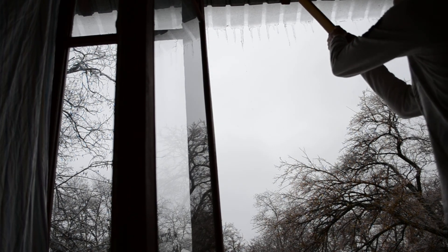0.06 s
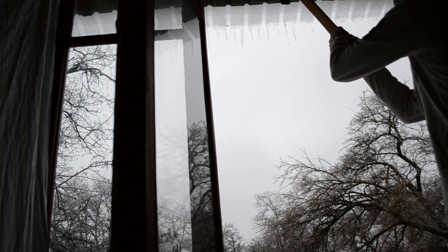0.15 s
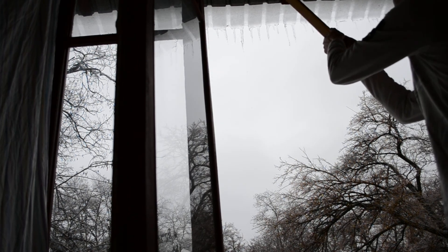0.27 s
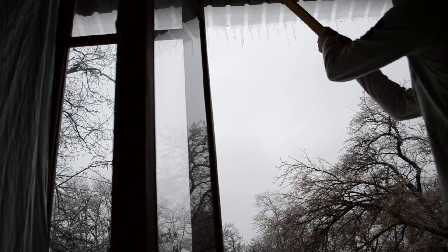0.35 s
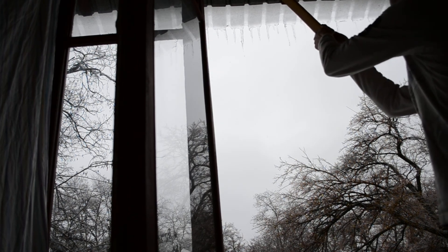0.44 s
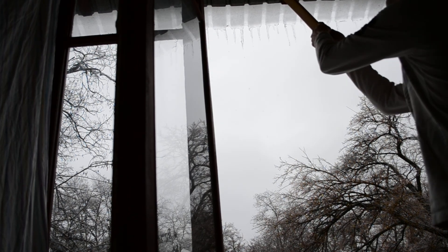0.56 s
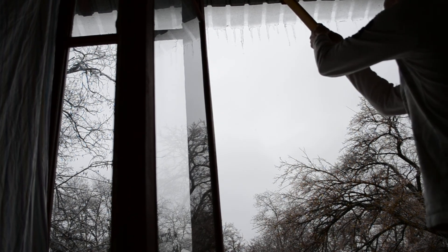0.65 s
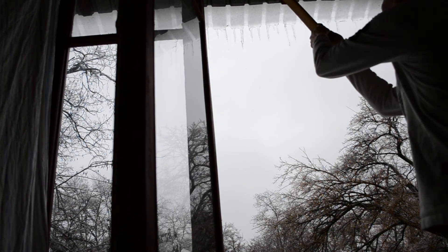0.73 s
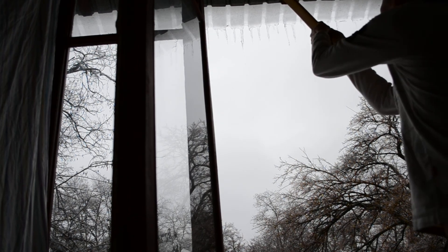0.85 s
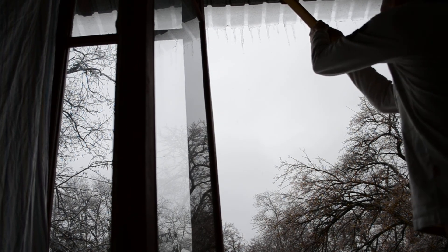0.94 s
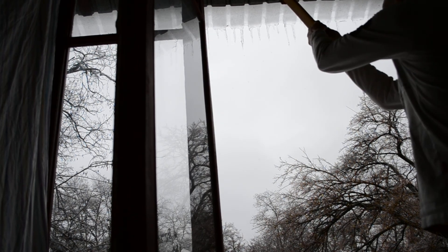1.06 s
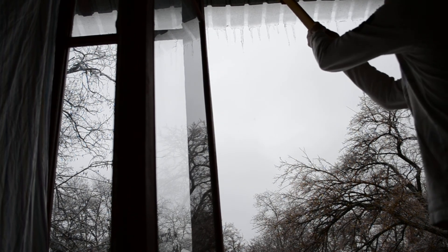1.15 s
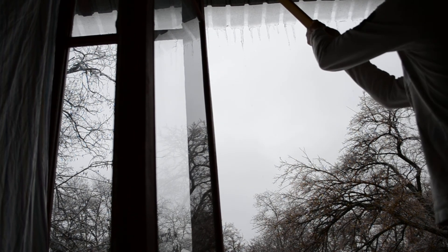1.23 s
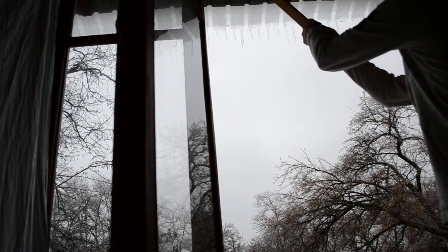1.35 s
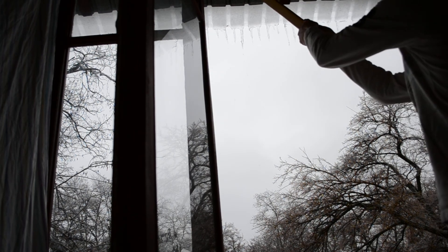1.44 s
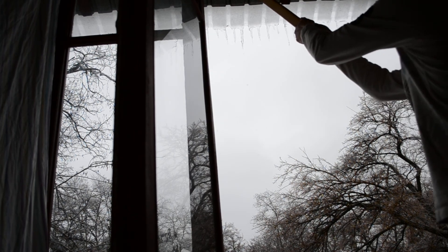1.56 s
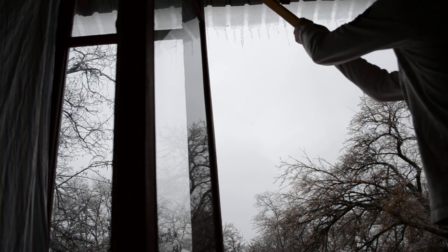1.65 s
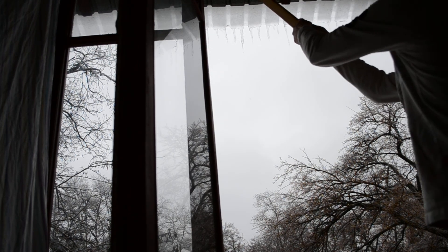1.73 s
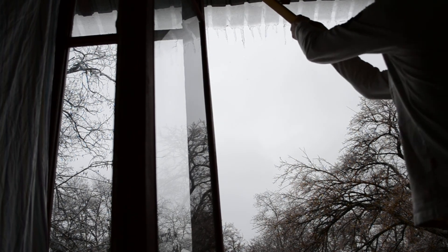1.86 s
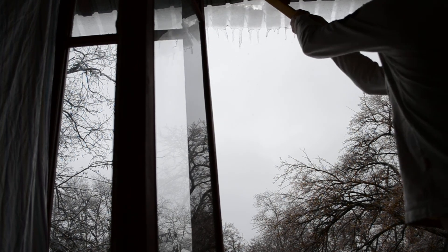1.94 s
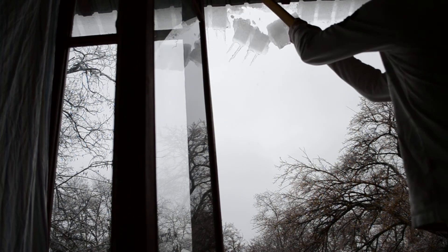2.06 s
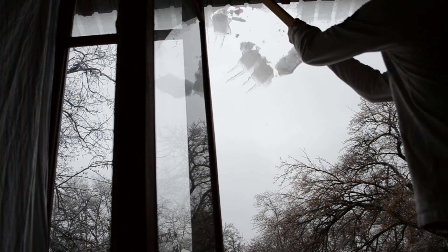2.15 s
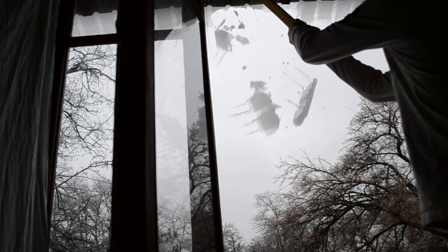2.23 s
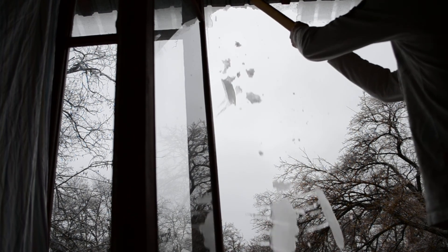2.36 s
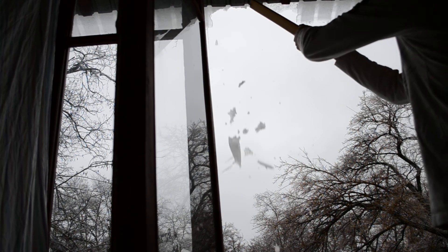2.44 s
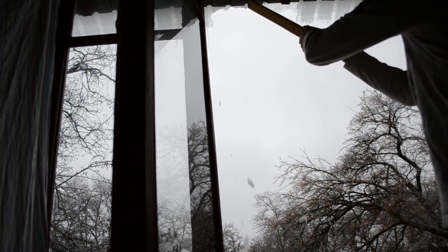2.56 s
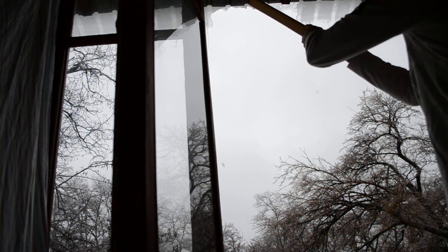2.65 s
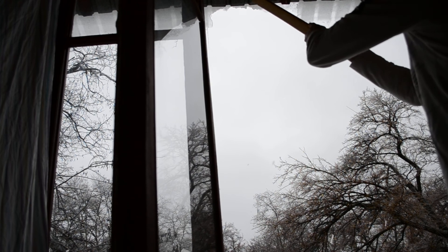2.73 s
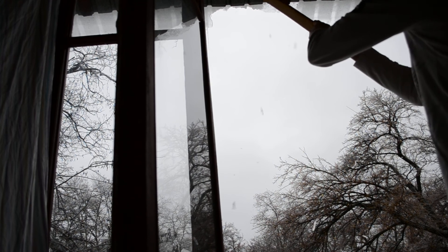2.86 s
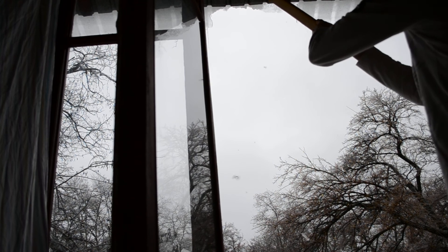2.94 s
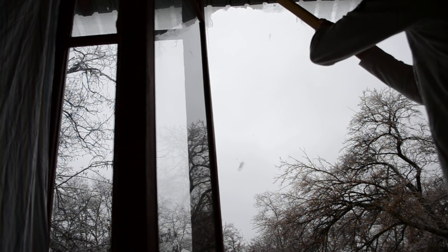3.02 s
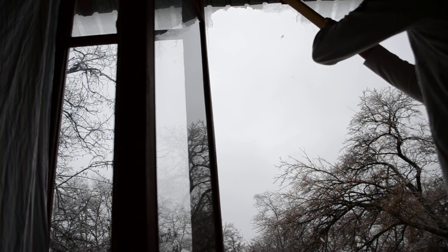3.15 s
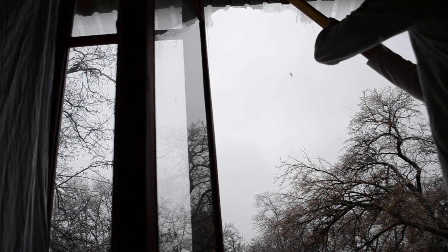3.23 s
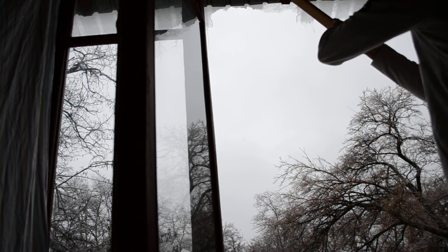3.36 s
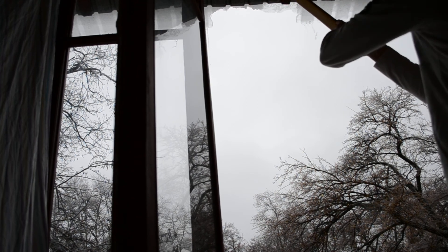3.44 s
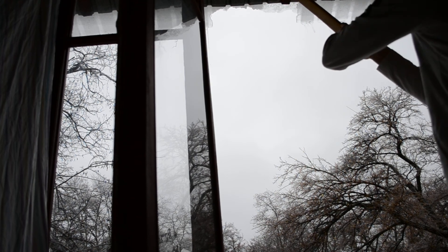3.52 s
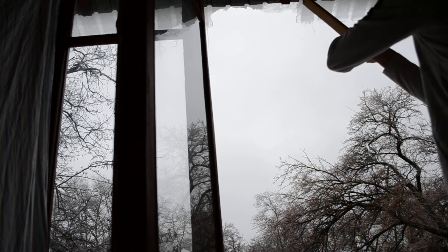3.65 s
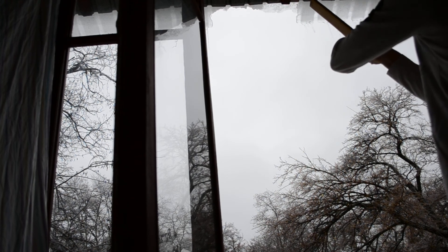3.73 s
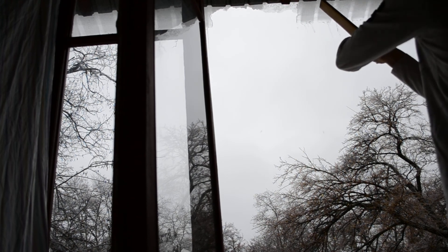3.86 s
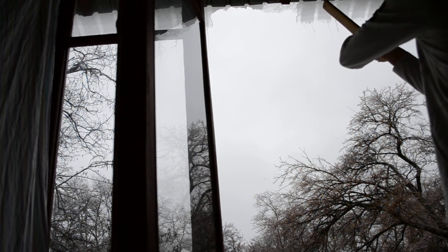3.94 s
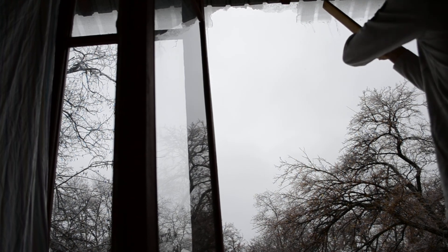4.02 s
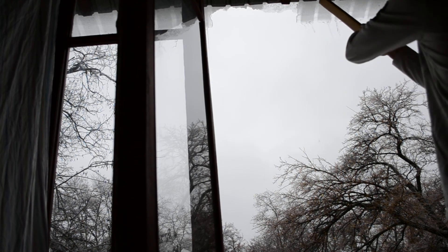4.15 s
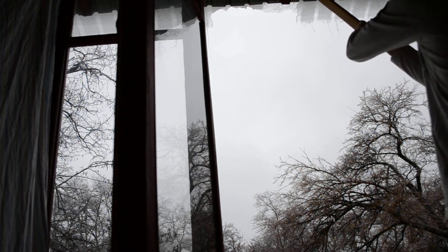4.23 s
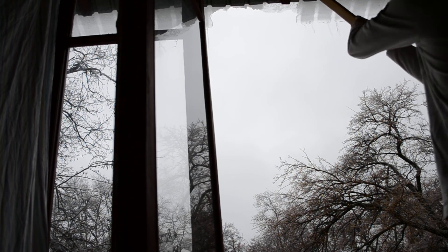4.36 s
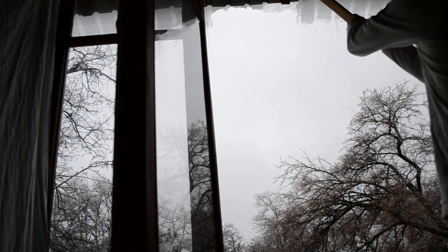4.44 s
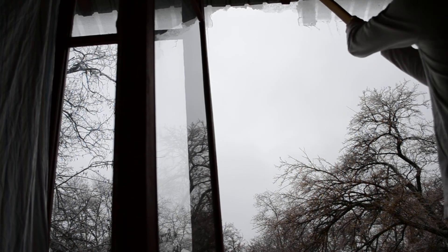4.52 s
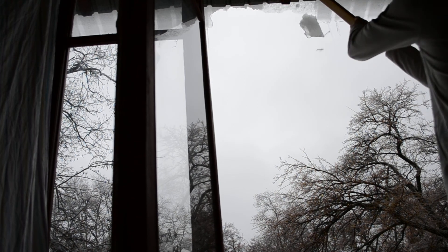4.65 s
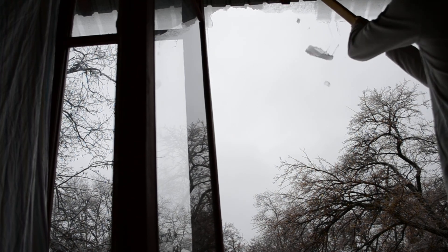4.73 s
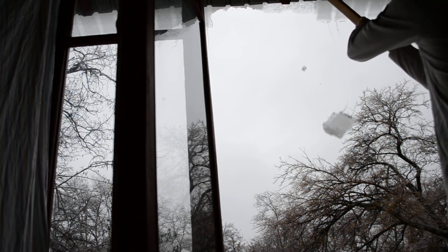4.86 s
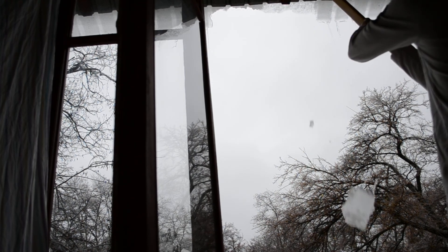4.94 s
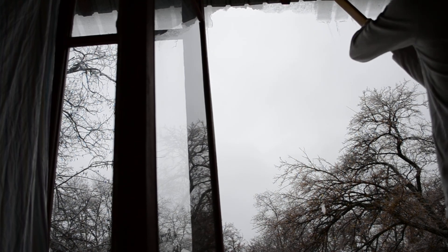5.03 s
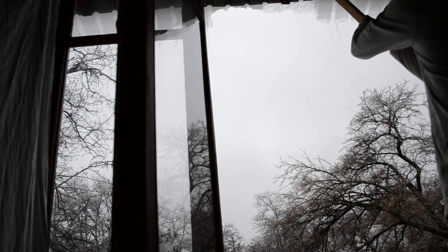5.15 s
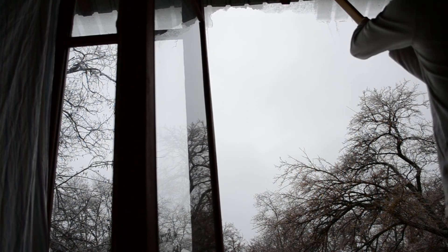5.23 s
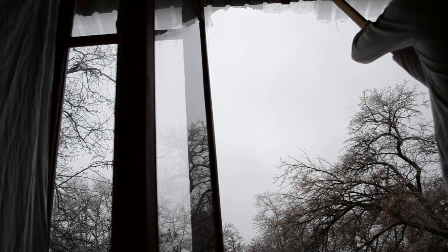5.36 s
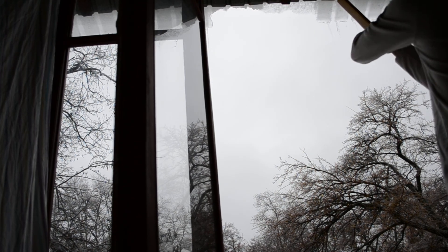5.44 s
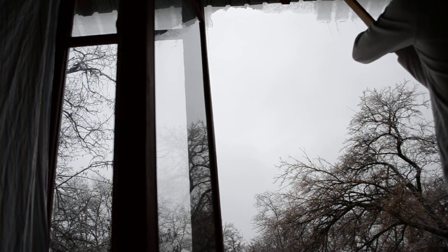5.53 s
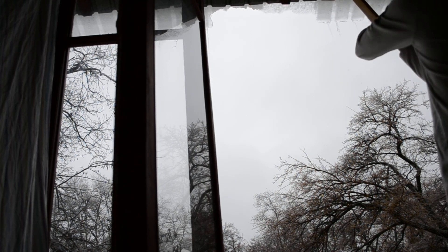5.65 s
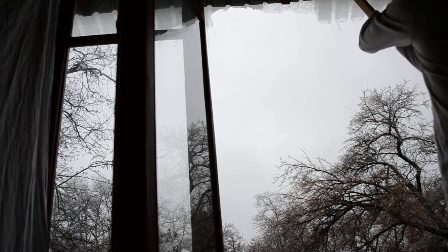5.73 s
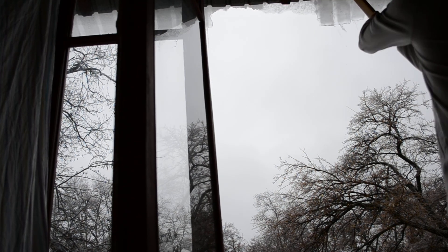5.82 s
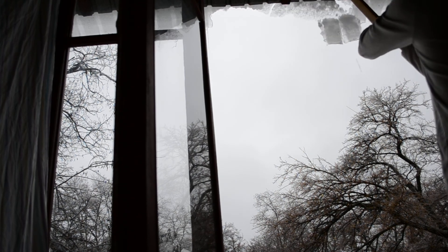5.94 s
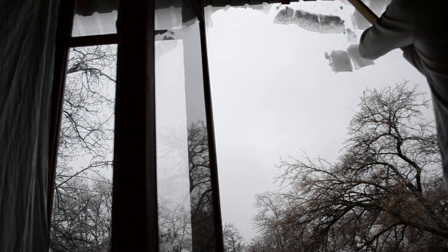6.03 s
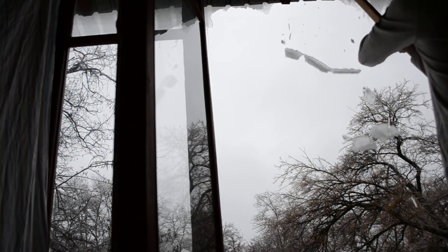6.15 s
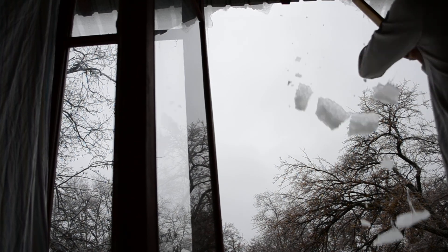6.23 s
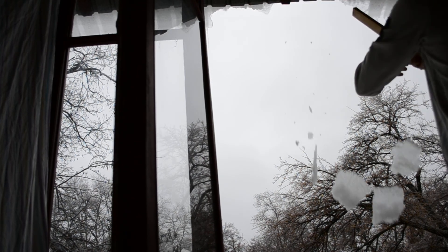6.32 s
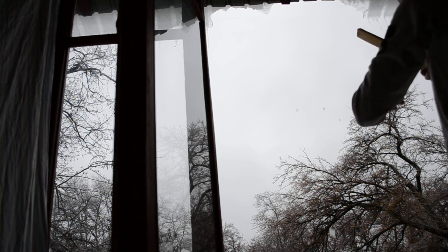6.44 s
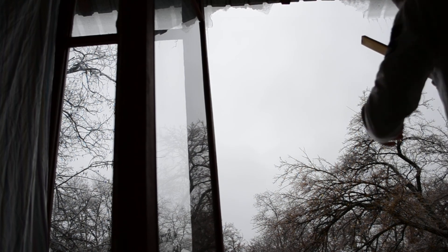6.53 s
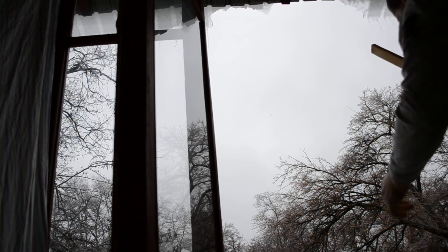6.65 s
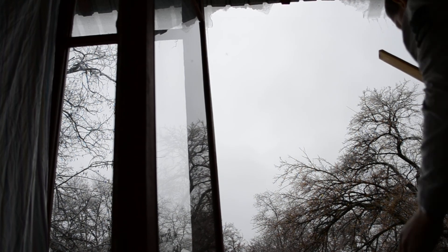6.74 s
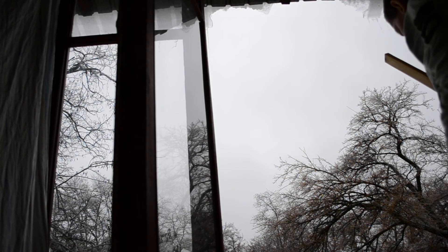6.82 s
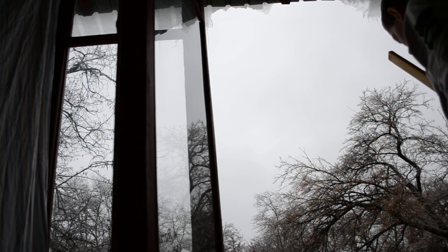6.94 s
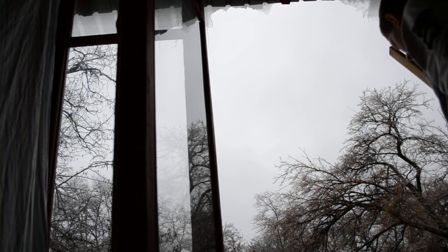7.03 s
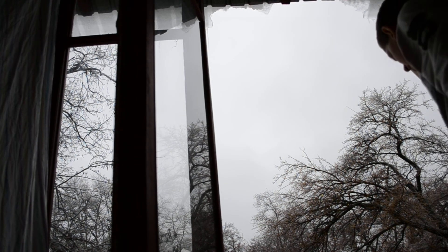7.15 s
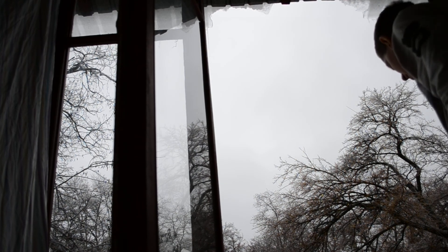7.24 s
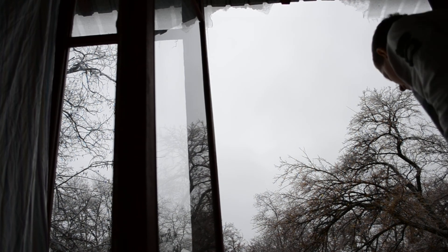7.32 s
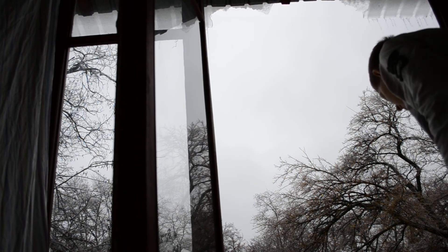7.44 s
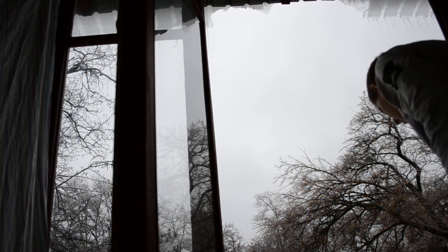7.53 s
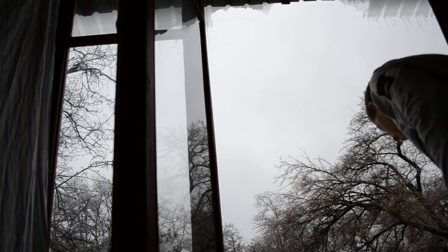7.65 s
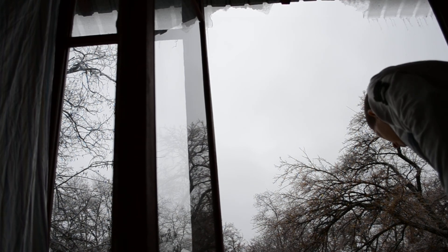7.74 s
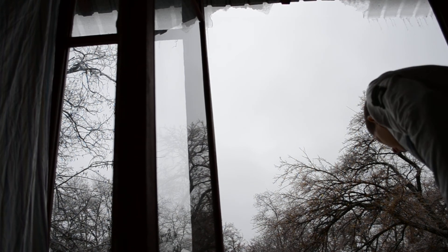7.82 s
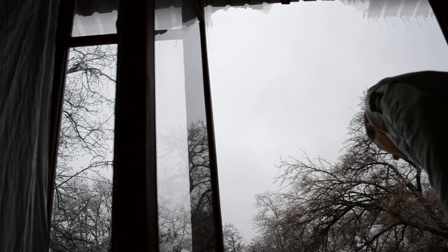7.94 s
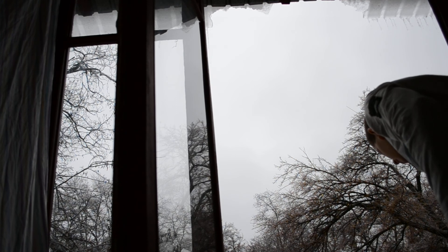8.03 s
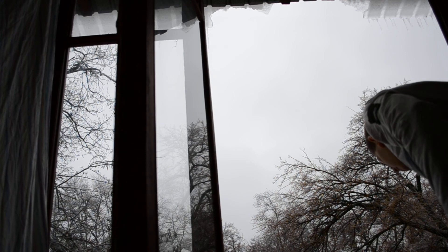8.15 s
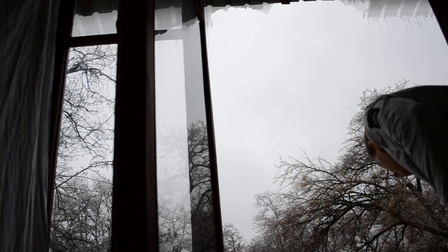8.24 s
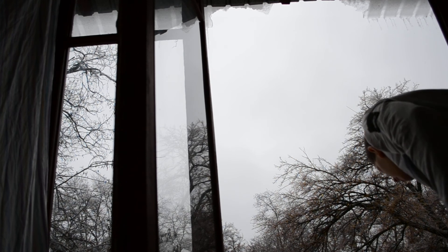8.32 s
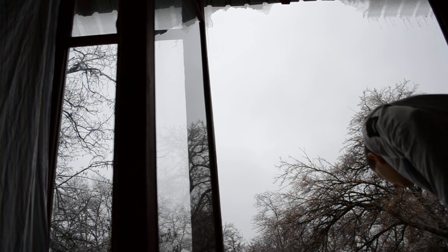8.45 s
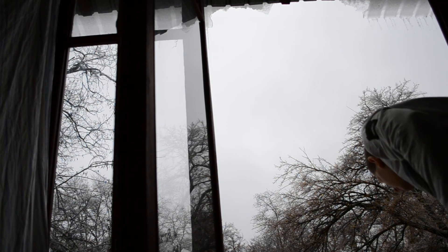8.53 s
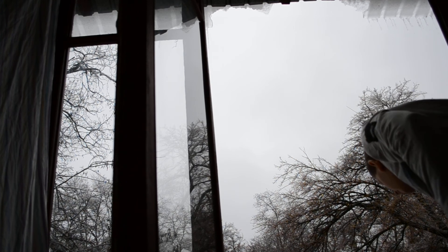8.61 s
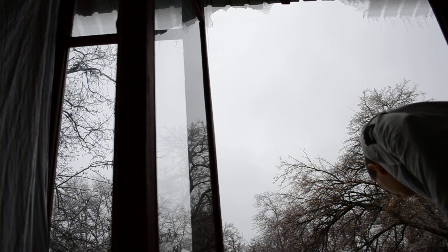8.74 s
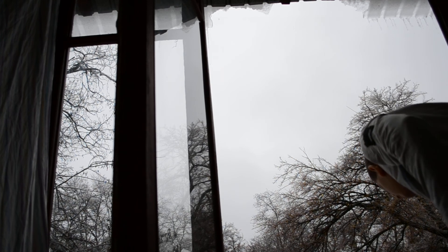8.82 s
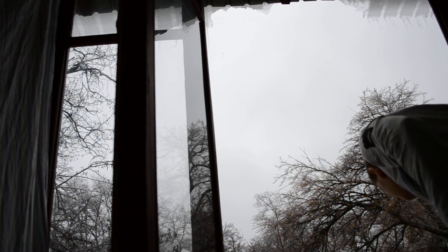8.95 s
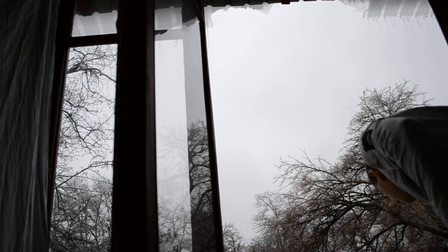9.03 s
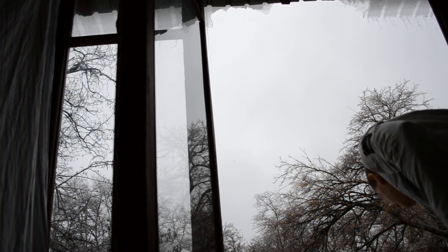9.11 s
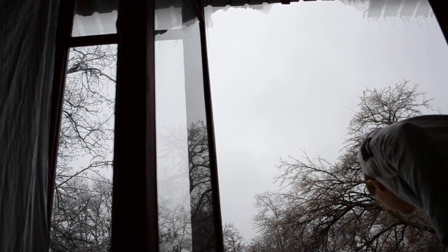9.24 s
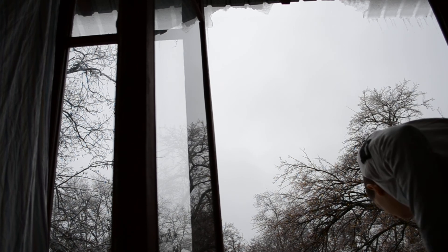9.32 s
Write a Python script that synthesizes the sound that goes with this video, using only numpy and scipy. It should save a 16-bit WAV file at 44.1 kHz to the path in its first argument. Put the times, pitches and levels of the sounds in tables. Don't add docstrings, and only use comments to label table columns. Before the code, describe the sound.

A stick pokes ice from a sheet-metal roof edge. Light knocks and brief thin squeaks lead to slabs giving way in crunchy bursts with low thuds and bright crackle. A hard, explosive smash follows, then spaced pokes and another big crack. Fine crumbs and glassy chips tick down irregularly, with faint low rumble, fading into quiet outdoor air. Captured by a small microphone just indoors, slightly overloaded at the loudest hit.

```python
import sys
import numpy as np
from scipy import signal
from scipy.fft import rfft, irfft, next_fast_len
from scipy.io import wavfile
from scipy.ndimage import uniform_filter1d

SR = 44100
rng = np.random.default_rng(int(sys.argv[2]) if len(sys.argv) > 2 else 0)


def convert_level_to_amplitude(level_db):
    exponent = np.asarray(level_db, float) / 20
    return 10 ** exponent


def waveform_to_disk(signal):
    frames = np.transpose(np.atleast_2d(signal))
    scaled = np.clip(frames, -1, 1) * 32767
    samples = np.round(scaled).astype(np.int16)
    wavfile.write(sys.argv[1], SR, samples)


N = 413658


def rms_one(x):
    return x / np.sqrt(np.mean(x ** 2) + 1e-20)


def coloured(spectrum):
    hz = np.maximum(np.fft.rfftfreq(N, 1 / SR), 1)
    points = np.array(spectrum)
    gain = convert_level_to_amplitude(np.interp(np.log(hz), np.log(points[:, 0]), points[:, 1]))
    return rms_one(irfft(rfft(rng.standard_normal(N)) * gain, N))


def flicker(rate_hz):
    slow = signal.butter(2, rate_hz, fs=SR, output="sos")
    return rms_one(signal.sosfilt(slow, rng.standard_normal(N)))


def swells(start, lasting, db, rise_db_per_s, fade_db_per_s):
    t = np.arange(0, N + 64, 64)[:, None] / SR
    before = np.maximum(start - t, 0)
    after = np.maximum(t - start - np.abs(lasting), 0)
    each = db - rise_db_per_s * before - fade_db_per_s * after
    total = 10 * np.log10(np.sum(convert_level_to_amplitude(2 * each), axis=1) + 1e-12)
    return np.interp(np.arange(N) / SR, t[:, 0], total)


def ring(clicks, hz, t60):
    r, w = convert_level_to_amplitude(-60 / (t60 * SR)), 2 * np.pi * hz / SR
    return signal.lfilter([.5, 0, -.5], [1, -2 * r * np.cos(w), r * r], clicks + 1e-18)


def grains(per_s, spread_db):
    sizes = convert_level_to_amplitude(spread_db * np.minimum(rng.exponential(1, N), 5)) * rng.choice([-1, 1], N)
    return rms_one(sizes * (rng.random(N) < per_s / SR))


# (f/Hz, level/dB per Hz)
HUSH_COLOUR = [(35, -30), (60, -17), (100, -15.5), (410, -5.5), (1280, -8.5), (6290, -21), (9310, -26),
               (11100, -22)]


def outdoor_hush():
    return convert_level_to_amplitude(-56 + .6 * flicker(3)) * coloured(HUSH_COLOUR)


# (t/s, lasting/s, level/dB)
SHAKES = [
    (2.04, .05, -63),
    (2.56, .02, -44.5),
    (5.75, 0.19, -62),
    (6.55, .02, -52),
]


def shudder():
    level_db = swells(*np.transpose(SHAKES), rise_db_per_s=125, fade_db_per_s=30)
    deep = coloured([(18, -21), (28, -1), (50, 3), (75, -12.0), (150, -68)])
    return convert_level_to_amplitude(np.maximum(-73, level_db)) * deep


def ground_rumble(slab_db):
    return convert_level_to_amplitude(slab_db - 19) * coloured([(50, -35), (90, -8), (140, 6.0), (220, -14.5), (400, -68)])


# (t/s, lasting/s, level/dB, heaviness/dB)
STREAMS = [(.77, 0.011, -44.5, 2), (.92, 0.21, -55.5, 3), (1.94, 0.085, -42.5, -1.5),
           (2.64, 0.096, -30.5, 5.5), (2.88, .02, -32, 0), (3.1, 0.41, -40, 0.5), (3.53, 0.41, -38.5, -4.5),
           (4.08, 0.23, -50.5, -5), (4.57, .15, -50, 4.5), (5.29, 0.02, -46, 5.5), (5.42, 0.12, -54.5, -24),
           (5.858, 0.0035, -37.5, 2), (6.2, 0.18, -47, -19), (6.4, 0.17, -46.5, 7.5),
           (6.6, .05, -44.5, 8.5), (6.83, 0.36, -43.5, -6), (7.2, 0.38, -41, -10), (7.8, 0.24, -48, -8)]


def debris():
    start, lasting, db, heavy = np.transpose(STREAMS)
    return [swells(start, lasting, level, rise_db_per_s=169.5, fade_db_per_s=56)
            for level in (db + heavy, db, db - 7 - 0.17 * heavy)]


def crumble(body, level_db, clump_db, count=10):
    low_hz, high_hz, cycles, per_s, spread_db, tilt_db = body
    stream, dealt = grains(per_s, spread_db), rng.integers(0, count, N)
    rings = np.zeros(N)
    for k, hz in enumerate(np.geomspace(low_hz, high_hz, count)):
        brightness = convert_level_to_amplitude(tilt_db * np.log2(hz / low_hz))
        rings += brightness * ring(stream * (dealt == k), hz, cycles / hz)
    return convert_level_to_amplitude(level_db + clump_db * flicker(19.8)) * rms_one(rings)


# (lowest f/Hz, highest f/Hz, cycles of ringing, cracks per s, size spread/dB, tilt/dB per octave)
TICK = (2000, 10000, 6.0, 70, 3.0, 2.0)


def ticks(crumb_db):
    return crumble(TICK, crumb_db - 15.0, clump_db=0.5, count=5)


# (t/s, lasting/s, from f/Hz, to f/Hz, level/dB)
SQUEAKS = [
    (1.675, .075, 3950, 3780, -52),
    (1.71, .095, 3650, 3250, -53),
    (1.68, .07, 5400, 4700, -67),
    (1.28, .25, 3200, 3100, -64),
    (.665, .05, 3900, 3950, -60),
    (5.37, .025, 3900, 3900, -50),
]


def squeaks():
    out, slip = np.zeros(N), .8 + .7 * flicker(200)
    for s, lasting, from_hz, to_hz, db in SQUEAKS:
        start, size = round(s * SR), int(lasting * SR)
        phase = 2 * np.pi * np.cumsum(np.geomspace(from_hz, to_hz, size)) / SR
        out[start:start + size] += convert_level_to_amplitude(db) * np.hanning(size) ** .5 * np.sin(phase)
    return out * slip


# (t/s, peak level/dB, f/Hz)
CHIPS = [(1.2855, -46, 3120), (1.3558, -45, 3110), (1.7255, -37, 3710), (1.7544, -31, 3360),
         (1.7904, -23, 3320), (1.8008, -19, 2720), (1.8956, -11, 2880), (2.0467, -10, 2240),
         (2.4703, -29, 3280), (2.5177, -11, 3150), (2.5374, -15, 3510), (2.5504, -17, 3540),
         (2.61, -9, 2340), (2.6444, -17, 5110), (2.6644, -19, 9130), (2.7122, -15, 5110),
         (2.9487, -21, 3240), (2.9911, -15, 2420), (3.1014, -26, 3850), (3.2101, -28, 3310),
         (3.2264, -29, 2760), (3.2685, -31, 4860), (3.2869, -23, 8310), (3.3014, -28, 3770),
         (3.5778, -23, 3380), (3.6511, -29, 2200), (3.7114, -19, 2290), (3.7479, -19, 3090),
         (3.7973, -26, 2900), (3.8094, -28, 2550), (3.8227, -30, 4180), (3.9838, -30, 2970),
         (4.0292, -27, 4050), (4.3096, -36, 3220), (4.3444, -39, 8200), (4.3755, -13, 3820),
         (4.3844, -19, 2640), (4.4894, -38, 2860), (4.5344, -21, 2540), (4.5444, -22, 2560),
         (4.8204, -37, 2680), (4.8763, -44, 2990), (5.1264, -21, 2670), (5.1562, -17, 2570),
         (5.6905, -8, 2920), (5.6954, -8, 2210), (5.7014, -8, 2280), (5.8002, -26, 2390),
         (5.8187, -26, 2530), (5.8554, -23, 2560), (5.9494, -25, 2860), (8.6023, -47, 2380),
         (9.3162, -43, 2790)]
# (t/s, peak level/dB, f/Hz)
LATE_CHIPS = [(5.9288, -25, 2770), (6.0425, -36, 3880), (6.0804, -39, 9480), (6.1622, -38, 8970),
              (6.2026, -37, 9060), (6.2151, -35, 8790), (6.253, -36, 6690), (6.2725, -35, 8880),
              (6.3418, -29, 2380), (6.4052, -31, 4440), (6.466, -27, 4240), (6.491, -20, 4100),
              (6.5843, -35, 3650), (6.6471, -26, 2840), (6.7763, -22, 5820), (6.7898, -13, 4330),
              (6.8512, -24, 9390), (6.923, -20, 3200), (6.9824, -27, 3120), (7.0253, -30, 3320),
              (7.0637, -32, 5250), (7.0801, -28, 2860), (7.1679, -31, 2350), (7.2004, -22, 5980),
              (7.2383, -21, 3310), (7.2827, -27, 3950), (7.3615, -22, 3330), (7.4558, -34, 8890),
              (7.4972, -27, 3820), (7.5102, -26, 2340), (7.6354, -28, 8330), (7.6623, -27, 3050),
              (7.7796, -33, 3370), (7.8055, -33, 8960), (7.8454, -36, 6130), (7.8664, -36, 6510),
              (7.9497, -29, 2830), (8.0125, -36, 2560), (8.0614, -40, 9150), (8.1048, -39, 8660),
              (8.1348, -41, 8790), (8.1916, -35, 2750), (8.445, -39, 8590), (8.7898, -43, 8840),
              (8.9494, -42, 8530)]
# (share of its pitch, level/dB)
CHIP_MODES = [(.6, -8.0), (1.0, -4.0), (1.7, -8.0)]


def chips():
    landings = CHIPS + [(s, db - 4.0, hz) for s, db, hz in LATE_CHIPS]
    return [(s, min(share * hz, 11000), db + mode_db, 40.0 / hz)
            for s, db, hz in landings for share, mode_db in CHIP_MODES]


# (t/s, f/Hz, peak level/dB, t60/s, the
# time to fade by 60 dB)
RINGS = [(.539, 454, -29, 0.084), (.54, 642, -17.5, 0.034), (.54, 2720, -38, 0.047),
         (0.539, 1420, -24.5, 0.022), (.738, 860, -29, 0.046), (0.745, 3240, -39, 0.13),
         (1.765, 180, -43, 0.12), (1.852, 196, -29.5, 0.26), (2.575, 270, -26, 0.22),
         (2.661, 235, -22, 0.19), (3.424, 272, -16, 0.078), (1.897, 2680, -22, 0.045),
         (1.896, 5200, -31, .01), (2.049, 1690, -22, 0.097), (2.05, 2250, -22, .06), (2.235, 183, -41, .15),
         (3.366, 3120, 2, 0.009), (3.366, 2100, -2, 0.008), (3.366, 6140, -12, .006),
         (3.366, 1200, -16, .008), (2.5, 400, -30, .12), (3.369, 2300, -18, .04), (3.37, 4300, -22, .04),
         (3.429, 2600, -15, .03), (3.4325, 2150, -12, .035), (3.424, 2000, -17, .02),
         (3.366, 4570, -7, 0.0099), (3.3735, 2780, -16, 0.03), (3.379, 3100, -20, .02),
         (3.4213, 720, 0, 0.015), (3.428, 700, -4, 0.025), (3.4355, 1500, -12, 0.015),
         (3.158, 800, -32, .12),
         (3.855, 1100, -24, 0.05), (3.857, 2500, -24, .04), (3.578, 1450, -26, .04),
               (4.379, 1550, -24, .1), (4.3785, 730, -18, .06), (4.3865, 1110, -20, .06),
               (4.472, 2800, -36, .05), (4.542, 1500, -28, .05), (5.12, 750, -24, .08),
               (5.156, 1100, -22, .06), (4.381, 148, -35.5, 0.23), (4.248, 9400, -37, .01),
               (4.377, 2400, -26.5, 0.11), (4.376, 710, -24, 0.085), (4.532, 550, -26, 0.075),
               (4.531, 2590, -29.5, 0.12), (4.58, 2770, -29, 0.087), (4.541, 530, -29, 0.046),
               (4.583, 580, -28.5, 0.054), (4.582, 1440, -28.5, 0.08), (5.12, 202, -23, 0.11),
               (5.128, 2600, -23.5, 0.055), (5.151, 2500, -26, 0.065), (5.332, 900, -52, 0.091),
               (5.688, 220, -19.5, 0.25), (5.688, 780, -19, 0.029), (5.692, 2283, -21, 0.05),
               (5.706, 2283, -16, 0.07), (5.722, 2283, -19, 0.05), (5.703, 1250, -18, .06),
               (5.712, 1500, -19, .06), (5.857, 2560, -30, .1), (5.93, 1750, -30, .08),
               (6.42, 310, -35, .2), (6.54, 260, -35, .2), (9.316, 700, -45, .035), (5.716, 400, -20, .05),
               (5.71, 1920, -22, .1), (5.71, 2900, -22, .06), (6.48, 272, -27, 0.15),
               (6.488, 1600, -27, .04), (7.955, 1500, -38, 0.065), (8.015, 1000, -36, 0.037),
               (8.106, 640, -37.5, 0.046), (8.19, 1750, -40, 0.047), (7.635, 300, -26, 0.043)]


def pieces(rattle=.9):
    per_s = 1500
    out, stream = np.zeros(N), grains(per_s, spread_db=3)
    for s, hz, db, t60 in RINGS + chips():
        start = round(s * SR)
        age = np.arange(min(int(1.5 * t60 * SR), N - start)) / SR
        end = start + len(age)
        push = rattle * stream[start:end] * convert_level_to_amplitude(-60 * age / t60) / np.sqrt(SR / per_s)
        push[0] = 1
        contact = np.hanning(int(.6 * SR / hz) + 3)
        struck = ring(np.convolve(push, contact)[:len(age)], hz, .4 * t60)
        out[start:end] += convert_level_to_amplitude(db) * struck / np.abs(struck).max()
    return out


# (t/s, level/dB, heaviness/dB, t60/s)
QUICK_SNAPS = [(0.537, -41.5, 12.5, 0.17), (0.707, -44.5, 0, 0.18), (0.738, -35, 0, 0.025),
               (0.793, -37, -7, .015), (.802, -36, 1.5, .028), (.894, -33, -3, 0.04),
               (0.902, -37, 1.5, 0.18), (.932, -39.5, -1.5, .077), (1.01, -44.5, 7, 0.073),
               (1.578, -39.5, 19, 0.12), (1.587, -26.5, 2, 0.08), (1.792, -38.5, -15, 0.024),
               (1.801, -30.5, -7, 0.053), (1.847, -27, 4.5, 0.045), (1.859, -26.5, 6, 0.67),
               (1.895, -22.5, 0, 0.049), (2.047, -20.5, -2.5, 0.02), (2.517, -27.5, -24, 0.098),
               (2.549, -26, -1, 0.053), (2.611, -22, 1, 0.064), (2.713, -33.5, -5, 0.056),
               (2.725, -36, 13, 0.14), (2.75, -32, -7, 0.026), (2.802, -51, 13, 0.015), (2.9, -43, 7, 0.16),
               (2.973, -34, -6, 0.044), (2.991, -32, -3, .048), (3.015, -35, -19, 0.045),
               (3.03, -37, -14, 0.36), (3.102, -43.5, -3.5, 0.26),
               (3.366, -22, -19, 0.013), (3.39, -35, -7, 0.036), (3.4215, -24, 17, 0.15),
                 (3.48, -19, -10, 0.038), (3.499, -25, -12, .017), (3.562, -29.5, -3, .015),
                 (3.577, -27, 3.5, 0.15), (3.62, -32.5, -16, 0.03), (3.681, -39.5, 12, 0.048),
                 (3.695, -29.5, -5.5, 0.02), (3.71, -45, -17, .07), (3.748, -33, 1.5, 0.16),
                 (3.797, -40, 2, 0.15), (4.13, -41, -15, .007), (4.206, -46, -18, .057),
                 (4.269, -36.5, -4.5, .007), (4.3755, -25, 2, 0.076), (4.471, -39, 10, 0.065),
                 (4.582, -30.5, -5, 0.057), (4.644, -42, 3, 0.05), (4.82, -47, 5.5, 0.048),
                 (5.119, -27, 10, 0.078), (5.691, -19.5, 1.5, 0.28), (5.799, -37, 3, 0.15),
                 (5.853, -29, 2.5, 0.14),
               (6.201, -59.5, 20, 0.073), (6.215, -51, 0, .008), (6.405, -41, 3, 0.02),
              (6.492, -35.5, -12, 0.022), (6.775, -39, -2, 0.048), (6.791, -29, -8, 0.18),
              (6.851, -36.5, -3, 0.27), (6.924, -31, -3, 0.015), (6.983, -41, -17, 0.04),
              (7.079, -35.5, 0.5, 0.065), (7.199, -32, -3.5, 0.11), (7.237, -29, -1.5, 0.16),
              (7.361, -37, -17, 0.022), (7.377, -44, 10, 0.14), (7.5, -32.5, 1.5, 0.24),
              (7.78, -38, 5, 0.048), (7.808, -43, 0, 0.062), (8.012, -45, 1, 0.027), (8.105, -51, -4, .039),
              (8.199, -41, 7, 0.11), (8.444, -51, -5, 0.19), (8.951, -53, -15, .19)]
# (t/s, level/dB, heaviness/dB, t60/s)
CRUNCHES = [(1.074, -54, 9.5, 0.19), (1.397, -50, -23, 0.095), (2.054, -25, 2, 0.072),
            (2.236, -40, 8, 0.13), (2.527, -27, 5.5, 0.16), (2.579, -36, 16.5, 0.072),
            (2.637, -25.5, 7, 0.12), (2.759, -33.5, 8, 0.16), (2.81, -33, -3, 0.4),
            (2.842, -31, 11.5, 0.075), (2.946, -36.5, -6.5, 0.051), (3.139, -40.5, -4.5, 0.19),
            (3.424, -26, 10.5, 0.22), (3.645, -46, 10, 0.11), (3.85, -26, 3, 0.17),
            (4.028, -37.5, 1.5, 0.32), (5.128, -33, 11, 0.069), (5.286, -40.5, 5, 0.047),
            (5.331, -49.5, 23.5, 0.095), (5.37, -47, -12.5, 0.246), (5.383, -42, -29, 1),
            (5.698, -27, 11, 0.16), (5.84, -34, 4.5, .014), (5.922, -32, 7.5, 0.2),
            (6.414, -56.5, 20, 0.44), (6.647, -37, -14, 1), (6.679, -40, -25, 0.35), (7.28, -38, 1, 0.075),
            (7.942, -38, 0.5, 0.21)]
# (t/s, level/dB, heaviness/dB, sliding/s)
SLIDES = [(1.755, -43.5, 3, .03), (1.812, -33, 6.5, .1), (1.973, -31.5, 7.5, 0.017),
          (2.468, -34.5, 4, 0.084), (2.56, -33, 3.5, 0.055), (2.673, -43, -15, 0.023),
          (4.385, -35, 6, 0.054), (4.528, -34, 5, 0.017), (4.701, -51.5, 5.5, 0.017),
          (5.142, -25.5, 5.5, 0.012), (6.475, -34, 7, 0.017), (7.632, -35.5, 4.5, 0.037)]


def breaks():
    snap_give_s, crunch_give_s, slide_t60_s = 0.0012, 0.0089, .21
    rows = [(*row[:3], snap_give_s, row[3]) for row in QUICK_SNAPS]
    rows += [(*row[:3], crunch_give_s, row[3]) for row in CRUNCHES]
    rows += [(*row, slide_t60_s) for row in SLIDES]
    levels = []
    for s, db, heavy, give, t60 in rows:
        thud_db = db - 3.5 + heavy
        crunch_db = db + 0.73 * min(heavy + 19, 0)
        crackle_db = db - 2.5 - max(heavy, -5)
        levels.append((s, thud_db, crunch_db, crackle_db, give, t60))
    return levels


def snaps(body, column, gain_db, t60_share, first_crack, count=8):
    low_hz, high_hz, cycles, per_s, spread_db, tilt_db = body
    stream, out = grains(per_s, spread_db), np.zeros(N)
    events = breaks()
    for row, draw in zip(events, rng.random((len(events), 2 * count))):
        start, hold = round(row[0] * SR), max(row[4], .001)
        t60 = np.clip(row[5] * t60_share, .006, .35)
        age = np.arange(min(int((hold + t60 + .03) * SR), N - start)) / SR
        end = start + len(age)
        push = stream[start:end] * convert_level_to_amplitude(-60 * np.maximum(age - hold, 0) / t60)
        push *= np.minimum(1, 0.55 * np.exp(-hold / .15) + age / (0.54 * hold))
        push[0] += first_crack * np.sqrt(SR / per_s) * np.exp(-hold / 0.023)
        pitches = low_hz * (high_hz / low_hz) ** ((np.arange(count) + draw[:count]) / count)
        piece = np.zeros(len(age))
        for k, (hz, chance) in enumerate(zip(pitches, draw[count:])):
            loudness = convert_level_to_amplitude(6.75 * chance + tilt_db * np.log2(hz / low_hz))
            piece += loudness * ring(push, hz, cycles / hz) * (-1) ** k
        head = piece[:int((hold + max(.003, 1.5 / low_hz)) * SR)]
        out[start:end] += convert_level_to_amplitude(row[column] + gain_db) * piece / np.sqrt(np.mean(head ** 2))
    return out


def size_class(x, body):
    edges = [.7 * body[0], 1.3 * body[1]]
    return signal.sosfilt(signal.butter(2, edges, "band", fs=SR, output="sos"), x)


# (lowest f/Hz, highest f/Hz, cycles of ringing, cracks per s, size spread/dB, tilt/dB per octave)
CRUMB = (3340, 15400, 4.64, 4000, 2.1, 1.5)


def crumbs(crumb_db):
    crackle = snaps(CRUMB, column=3, gain_db=-2.0, t60_share=0.7, first_crack=2.16)
    return size_class(crackle + crumble(CRUMB, crumb_db - 3.0, clump_db=3.5), CRUMB)


# (lowest f/Hz, highest f/Hz, cycles of ringing, cracks per s, size spread/dB, tilt/dB per octave)
ICE = (1170, 3700, 3.14, 1800, 2.4, 0.53)


def ice(crunch_db):
    crunch = snaps(ICE, column=2, gain_db=-3.0, t60_share=0.83, first_crack=1.32)
    return size_class(crunch + crumble(ICE, crunch_db - 5.5, clump_db=3.0), ICE)


# (lowest f/Hz, highest f/Hz, cycles of ringing, cracks per s, size spread/dB, tilt/dB per octave)
SLAB = (194, 855, 4.37, 1000, 2.7, 5.74)


def slabs(slab_db):
    thud = snaps(SLAB, column=1, gain_db=-5.5, t60_share=1.21, first_crack=2.6)
    return size_class(thud + crumble(SLAB, slab_db - 7.0, clump_db=-0.7), SLAB)


def room(x):
    t60_s, wall_cut_hz = 0.18, 5000
    size = next_fast_len(N + SR)
    hz = np.fft.rfftfreq(size, 1 / SR)
    dull = 1 / np.sqrt(1 + (hz / wall_cut_hz) ** 2)
    echoes = 0
    for k, lag in enumerate(rng.uniform(0.0034, 0.047, 12)):
        loop = convert_level_to_amplitude(-60 * lag / t60_s) * dull ** (lag / .02) * np.exp(-2j * np.pi * hz * lag)
        echoes = echoes + (-1) ** k * loop / (1 - loop)
    return irfft(rfft(x, size) * echoes, size)[:N]


# (f/Hz, width/Hz, level/dB)
PORT = [(7950, 900, -9.0), (9300, 2240, 9.0)]


def microphone_port(x):
    for hz, width_hz, db in PORT:
        b, a = signal.iirpeak(hz, hz / width_hz, fs=SR)
        x = x + (convert_level_to_amplitude(db) - 1) * signal.lfilter(b, a, x)
    return x


def scene():
    slab_db, crunch_db, crumb_db = debris()
    fall = slabs(slab_db) + ice(crunch_db) + crumbs(crumb_db) + pieces() + squeaks() + ticks(crumb_db)
    fall = signal.sosfilt(signal.butter(2, 100, "high", fs=SR, output="sos"), fall)
    heard = fall + convert_level_to_amplitude(-20) * room(fall)
    near = microphone_port(heard + outdoor_hush())
    near = signal.sosfilt(signal.butter(8, 9600, fs=SR, output="sos"), near)
    return np.array([near + shudder() + ground_rumble(slab_db)])


def bass_cut(x):
    over_db = np.clip(20 * np.log10(np.abs(x) + 1e-9) + 5.5, 0, 4.5)
    back = 13 * np.arange(N) / SR
    cut_db = np.maximum.accumulate(2.7 * over_db + back, axis=-1) - back
    cut_db = uniform_filter1d(cut_db, size=2001, origin=1000)
    bass = signal.sosfiltfilt(signal.butter(2, [60, 270], "band", fs=SR, output="sos"), x)
    return x - (1 - convert_level_to_amplitude(-cut_db)) * bass


def band_limit(x):
    return signal.sosfilt(signal.butter(12, 16800, fs=SR, output="sos"), x)


def record(dry):
    dry = bass_cut(dry)
    overload = .74
    flattened = dry / (1 + (np.abs(dry) / overload) ** 6) ** (1 / 6)
    top_edge = signal.cheby2(10, 8, 11800, fs=SR, output="sos")
    mix = signal.sosfilt(top_edge, flattened)
    return band_limit(mix)


dry = scene()
out = record(dry)
waveform_to_disk(out)
```